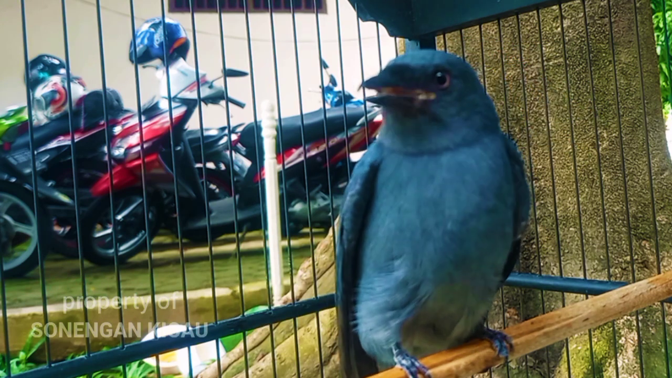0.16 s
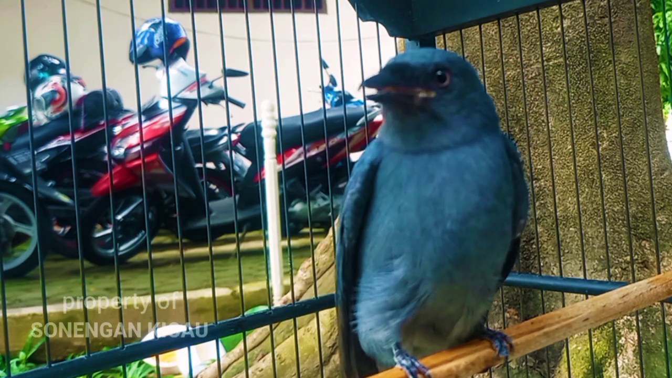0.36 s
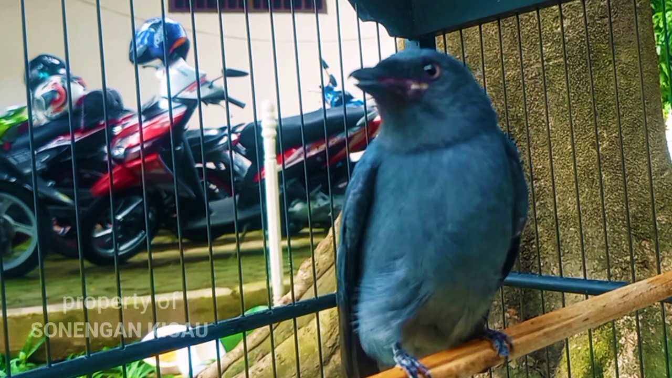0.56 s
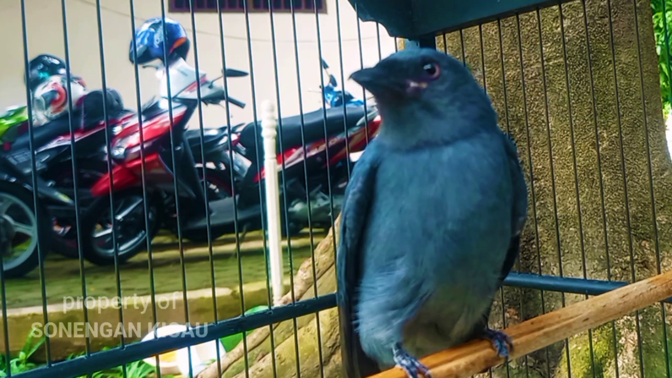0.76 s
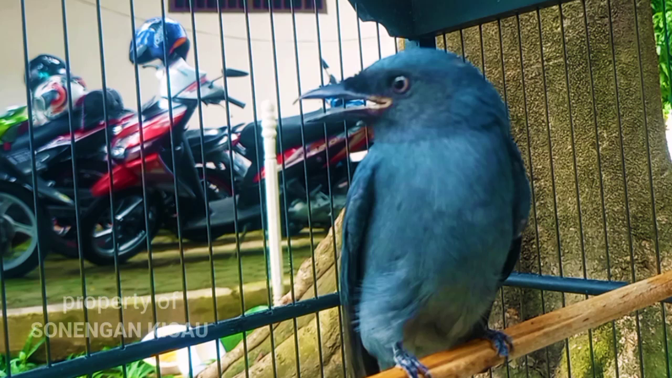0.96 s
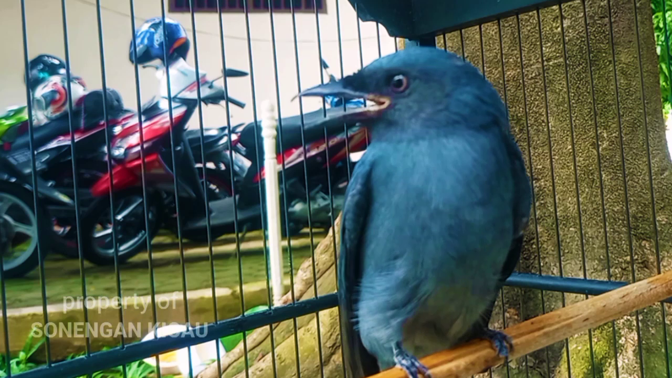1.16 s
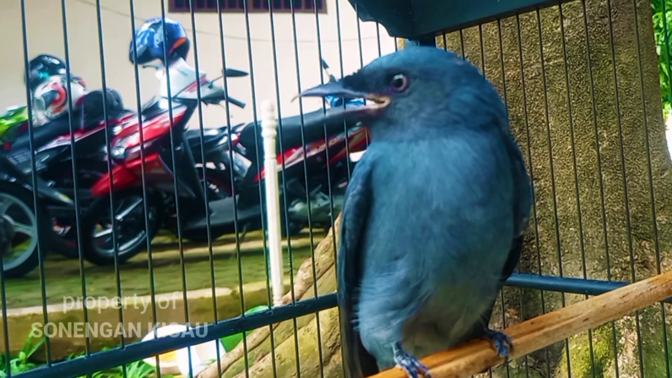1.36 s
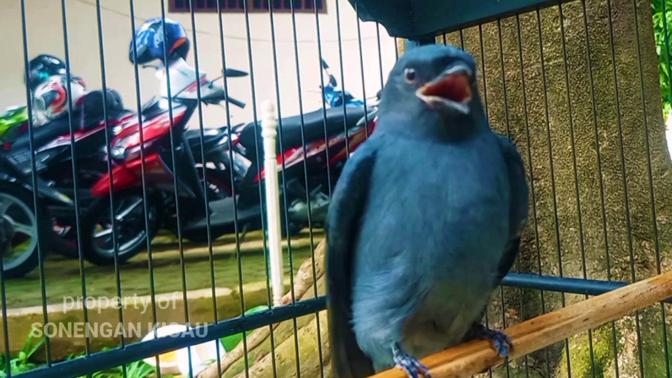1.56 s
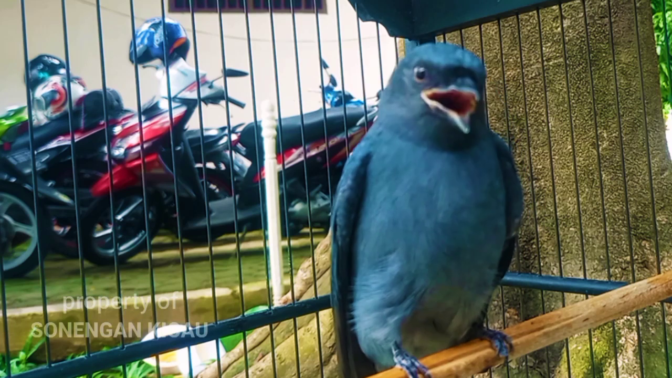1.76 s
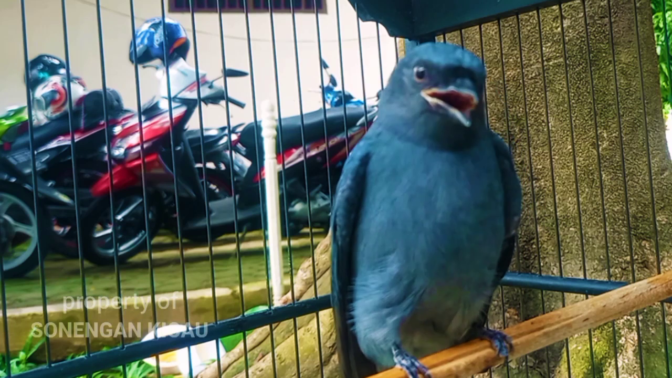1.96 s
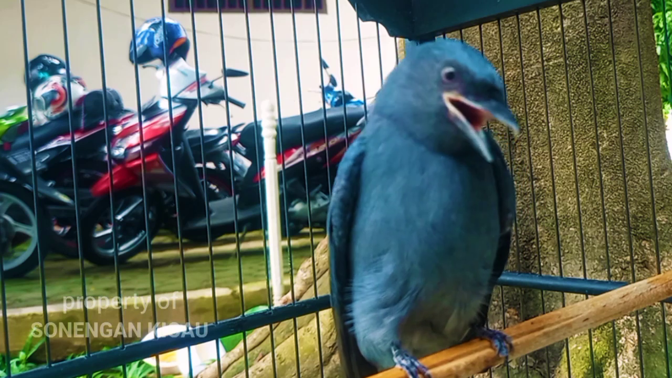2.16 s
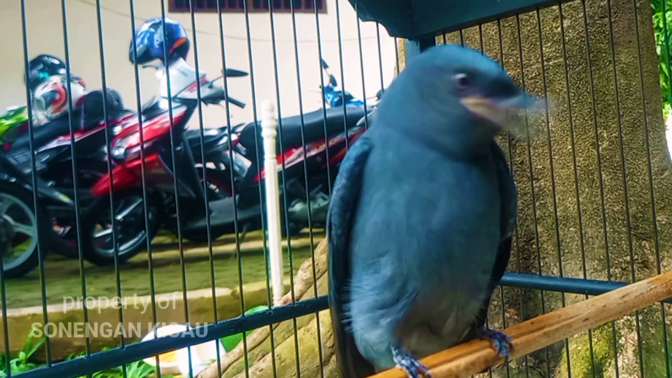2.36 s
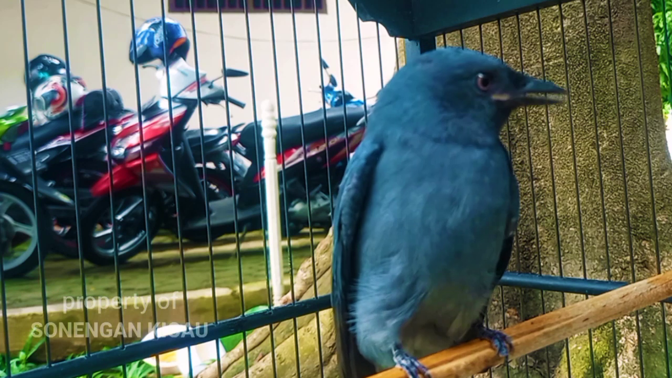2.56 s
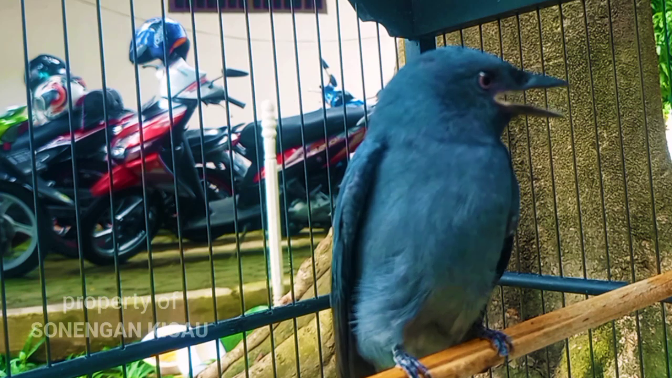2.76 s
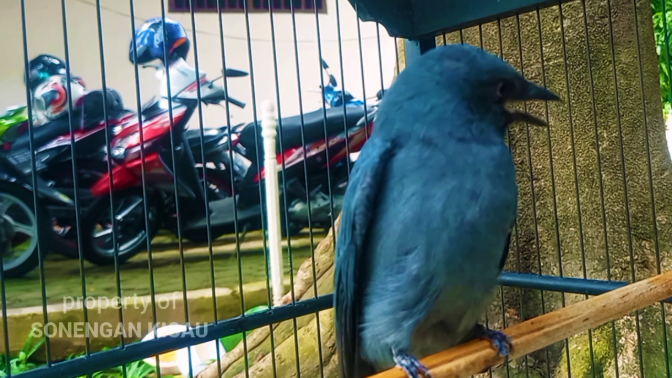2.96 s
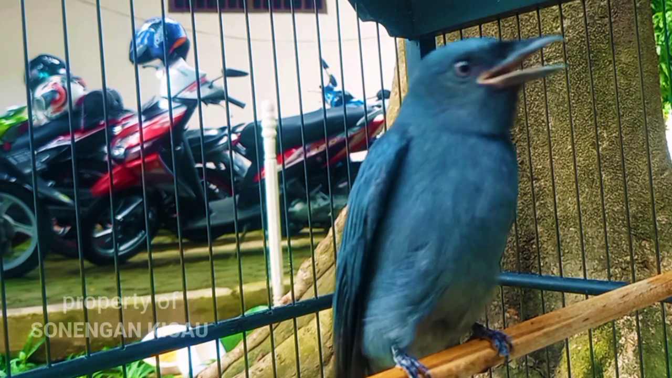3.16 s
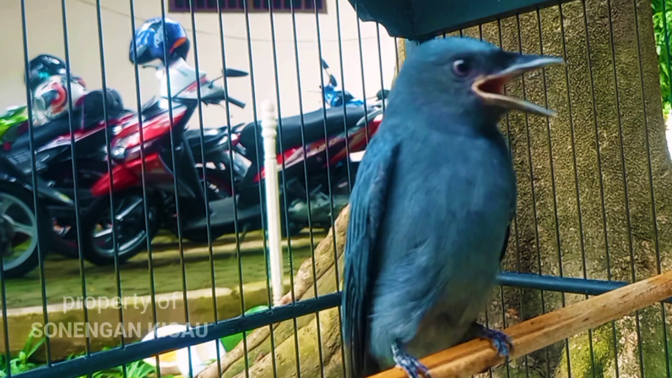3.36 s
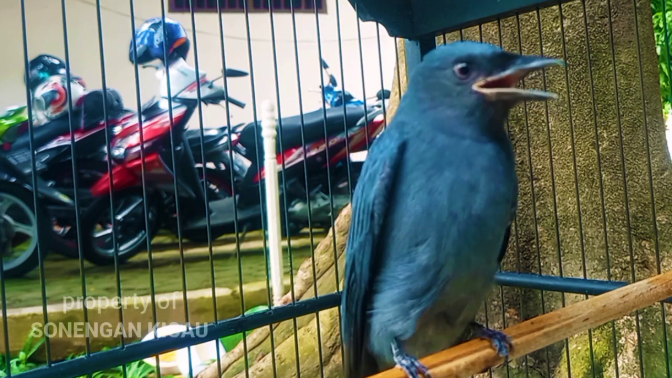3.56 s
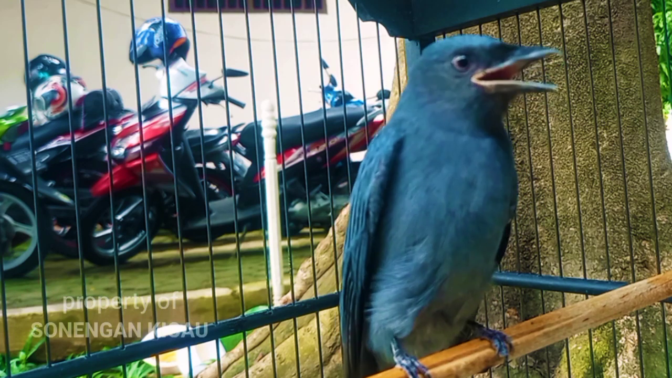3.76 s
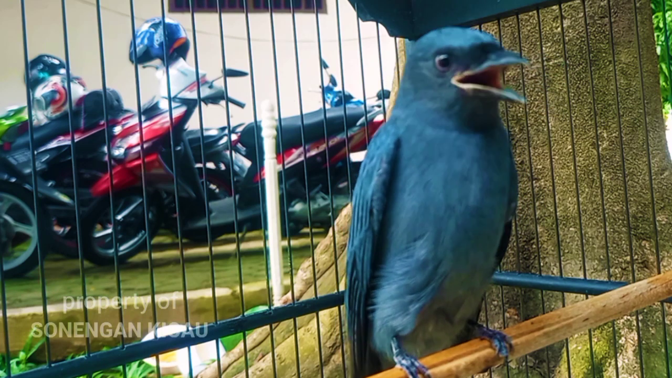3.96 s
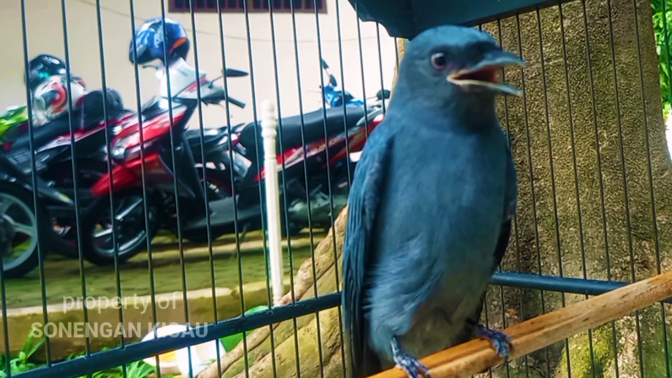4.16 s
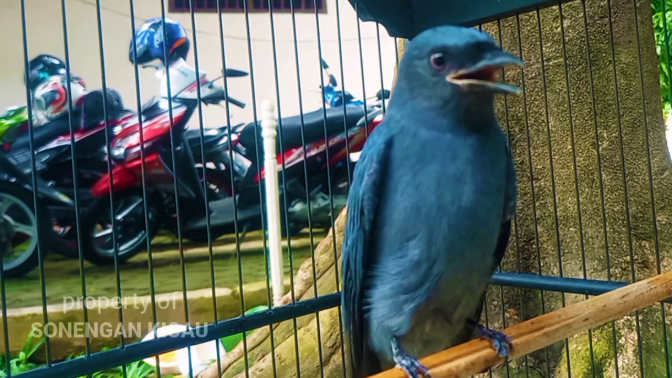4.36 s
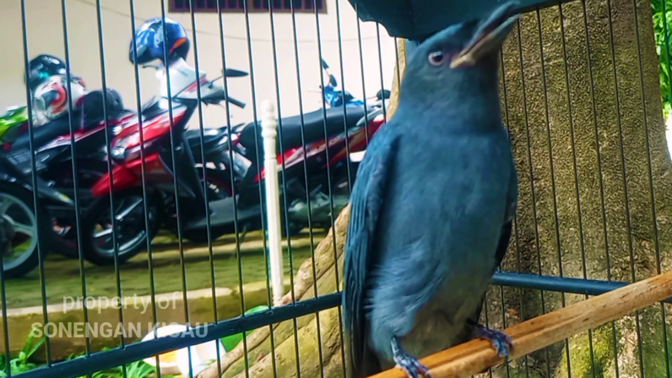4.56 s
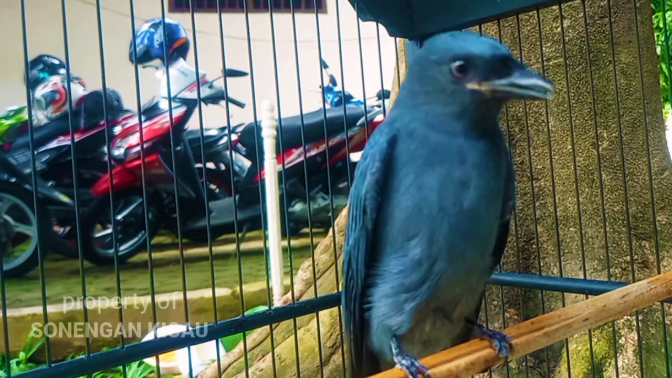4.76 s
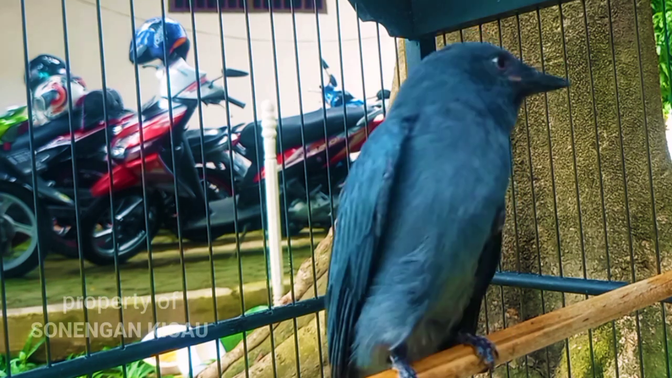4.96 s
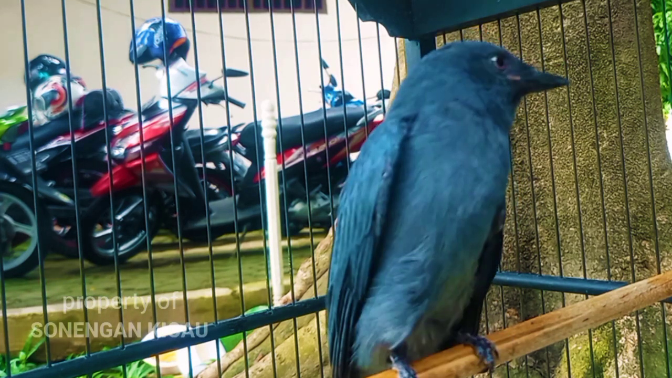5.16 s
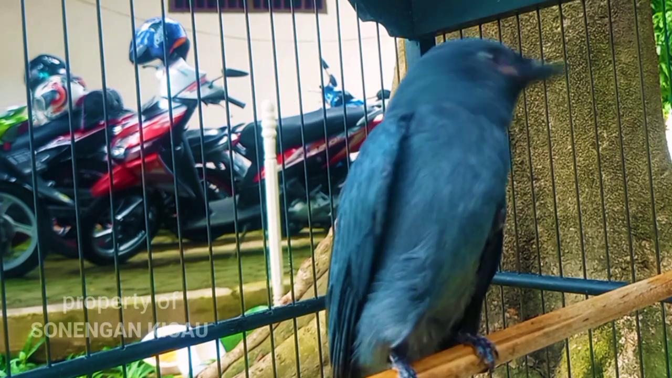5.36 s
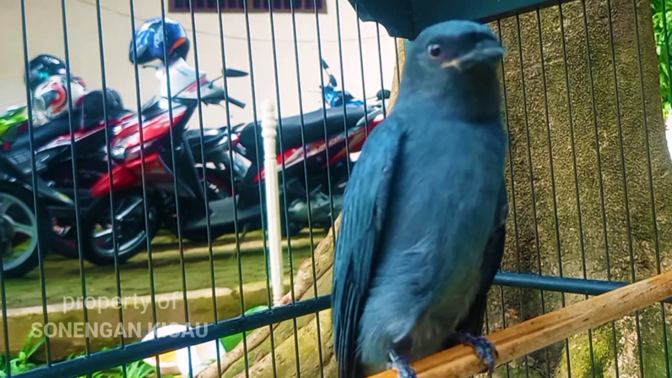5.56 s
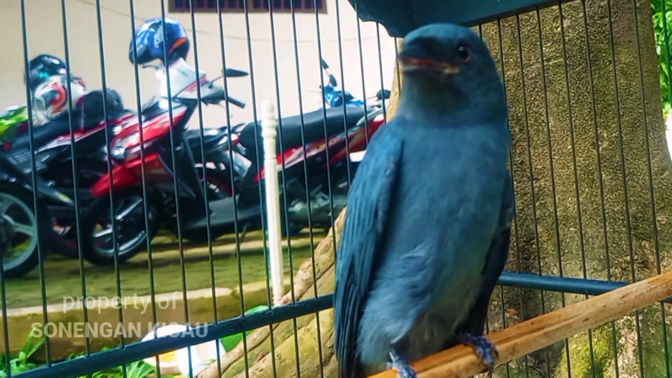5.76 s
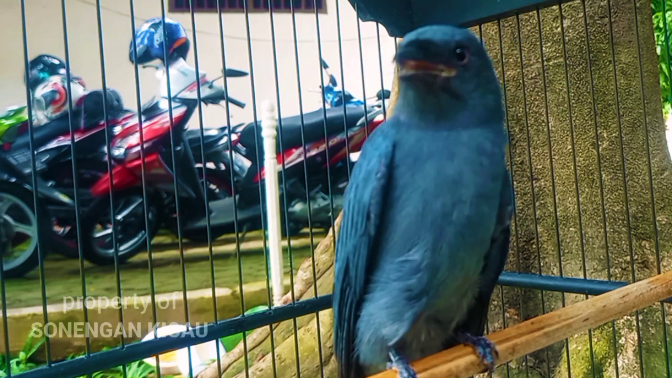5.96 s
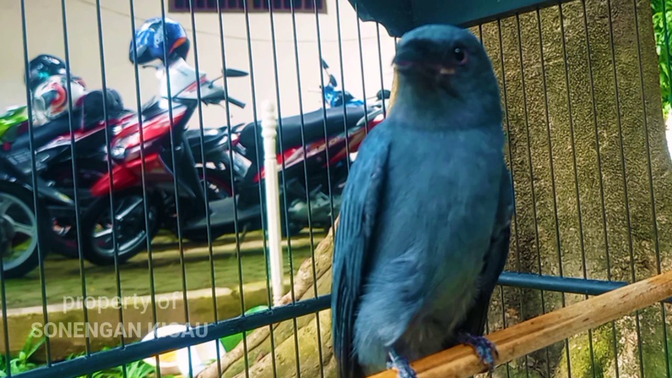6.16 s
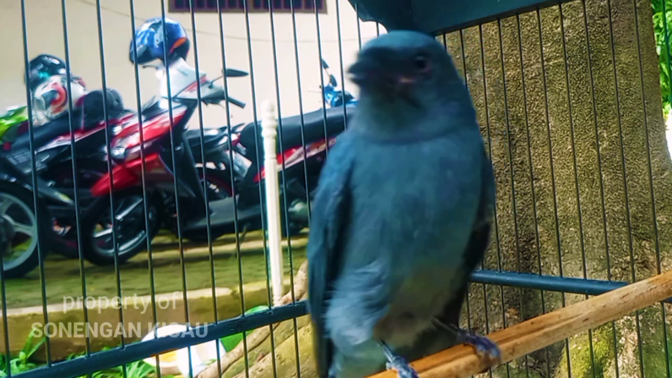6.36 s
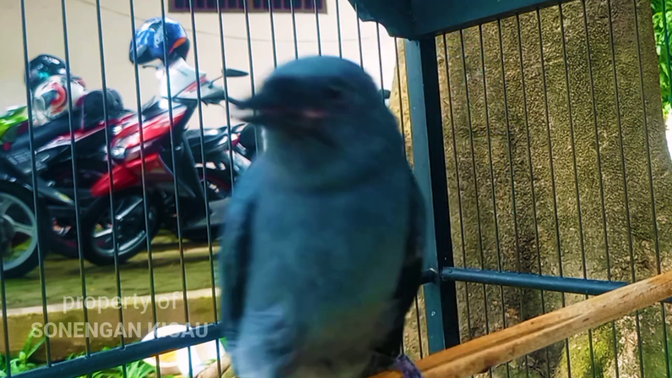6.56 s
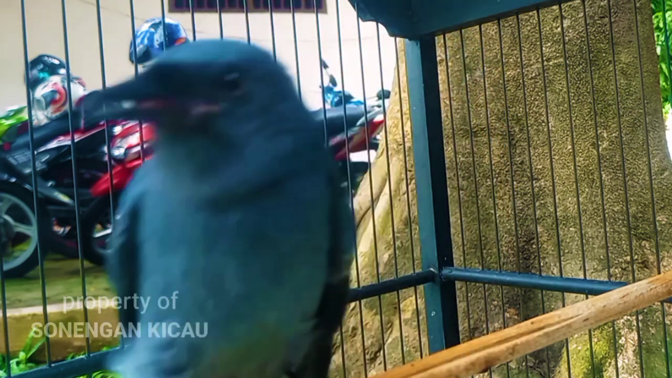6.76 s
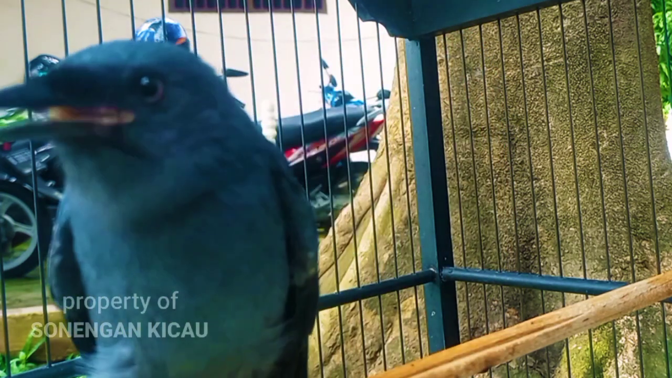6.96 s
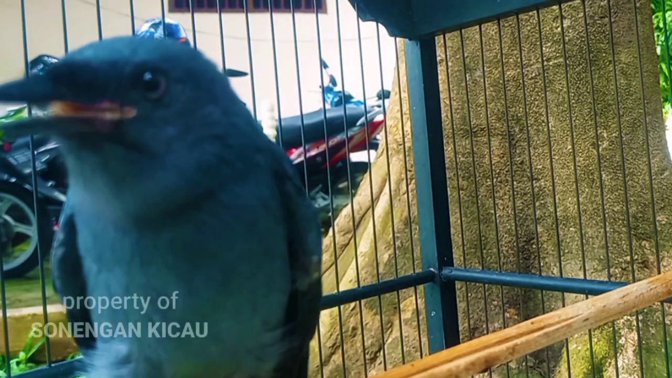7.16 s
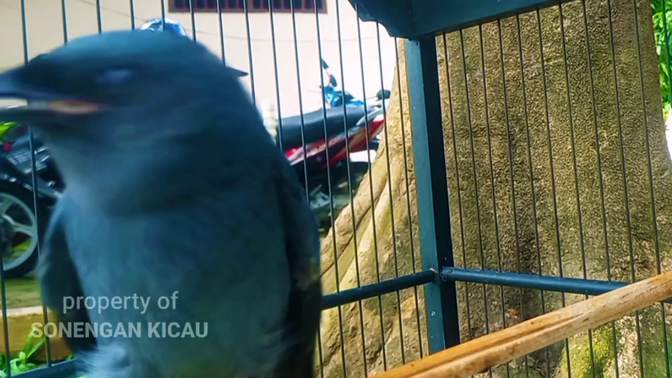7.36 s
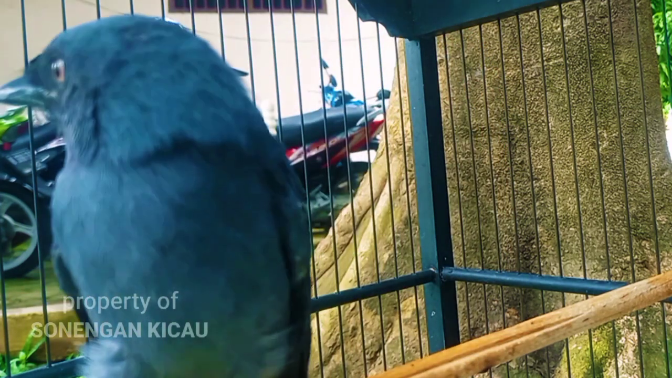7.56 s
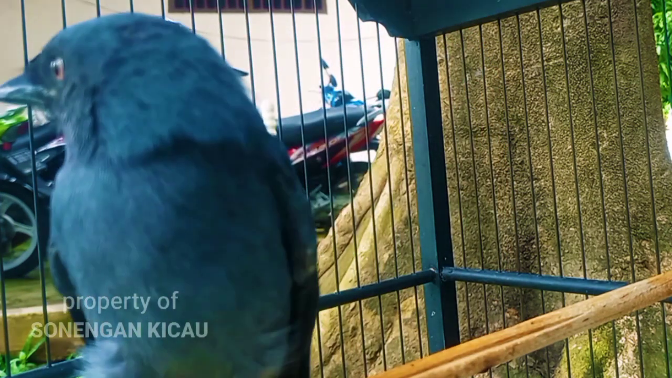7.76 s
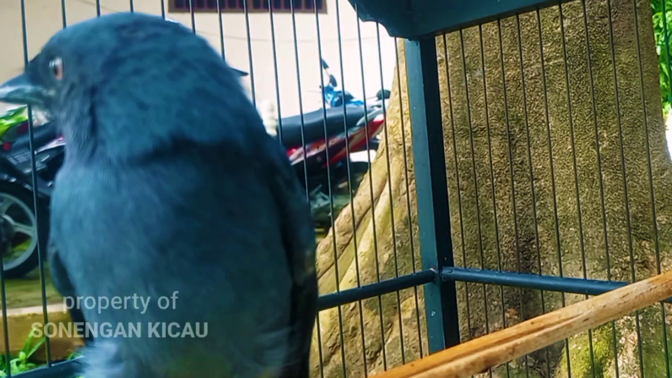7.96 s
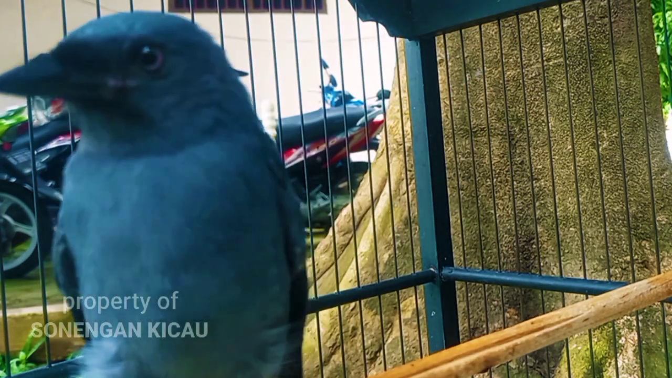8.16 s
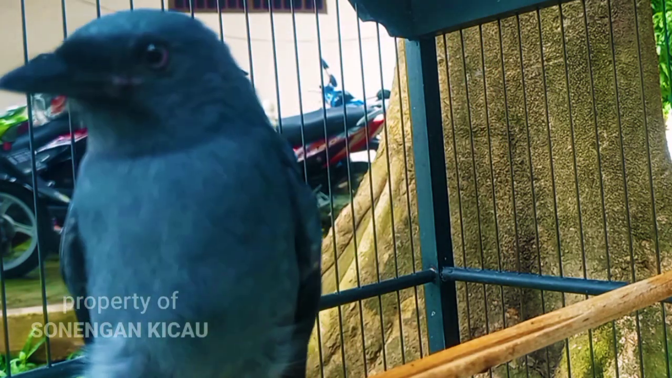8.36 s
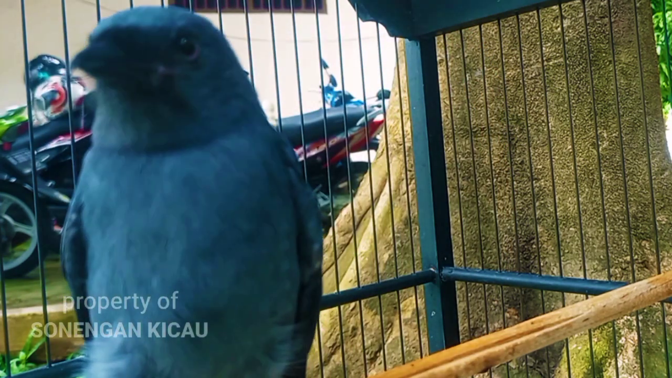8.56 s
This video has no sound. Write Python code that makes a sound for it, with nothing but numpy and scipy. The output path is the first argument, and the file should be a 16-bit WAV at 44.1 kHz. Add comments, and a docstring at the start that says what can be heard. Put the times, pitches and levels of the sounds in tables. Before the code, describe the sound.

A caged drongo sings very close to stereo microphones in a walled yard. Four short whistles open, the first rough-edged, then a long string of harsh, creaky chirps follows. After a pause come one chirp, a quick upward slur and evenly spaced clear whistles as the bird moves nearer and further left. Small beak and claw ticks, soft echoes, and low distant traffic lie around it.

```python
"""A walled yard, with distant traffic rumbling underneath as filtered noise and faint engine tones, and far-off birds.
Close to the stereo microphones a caged drongo sings: arched whistles built from harmonics, a long run of
harsh chirps that mix a mostly rising tone with chopped air noise, one clear upward slur, then whistles again
as it hops nearer. Its beak and claws tick and its feathers rustle, as short noises.
The cage colours each note with very short echoes; the walls answer softly through a decaying noise tail."""
import sys
import numpy as np
from scipy import signal
from scipy.fft import rfft, irfft, next_fast_len
from scipy.io import wavfile
from scipy.ndimage import map_coordinates

SR = 44100
rng = np.random.default_rng(int(sys.argv[2]) if len(sys.argv) > 2 else 0)


def to_wav(s):
    """Save 16-bit WAV."""
    ch = np.atleast_2d(s).T  # columns
    pcm = np.round(np.clip(ch, -1, 1) * 32767)  # PCM
    wavfile.write(sys.argv[1], SR, pcm.astype(np.int16))


N = 383669


def amp(db):
    """Decibels to gain."""
    return 10 ** (np.asarray(db) / 20)


def unit(x):
    """Scaled to rms 1."""
    return x / np.sqrt(np.mean(x ** 2) + 1e-20)


def along(points, hz):
    """(Hz, value) points read on a log frequency axis."""
    f, v = np.transpose(points)
    return np.interp(np.log(hz + 1), np.log(f + 1), v)


def path(rows, t):
    """(position, value) points joined by straight lines."""
    s, v = np.transpose(rows)
    return np.interp(t, np.maximum.accumulate(s), v)


def wobble(rate, size):
    """A smooth random curve, rate knots a second."""
    knots = rng.standard_normal(int(size * rate / SR) + 4)
    return map_coordinates(knots, [np.arange(size) * rate / SR])


def filtered(x, response):
    """x times a response of frequency."""
    size = x.shape[-1]
    m = next_fast_len(size + 2048)
    return irfft(rfft(x, m) * response(np.fft.rfftfreq(m, 1 / SR)), m)[..., :size]


def noise(spectrum, size):
    """Coloured noise of rms 1."""
    return unit(filtered(rng.standard_normal(size), lambda hz: amp(along(spectrum, hz))))


# how alike the two microphones hear a wide source: f/Hz, likeness (0 to 1)
LIKENESS = [(60, 0.97873), (130, 0.97), (250, .8), (500, 0.75), (1000, 0), (3000, 0)]


def surround(spectrum):
    """Stereo noise of rms 1: long bass waves reach both microphones alike, the treble is unrelated."""
    def mid_side(hz):
        turn = np.arccos(np.clip(along(LIKENESS, hz), -1, 1)) / 2
        return amp(along(spectrum, hz)) * [np.cos(turn), np.sin(turn)]

    mid, side = filtered(rng.standard_normal((2, N)), mid_side)
    return unit(np.array([mid + side, mid - side]))


# distant traffic before trims and surges: t/s, engines level/dB, tyres level/dB, road hiss level/dB
TRAFFIC_LEVELS = [(0.0, -37.5, -35, -55.5), (0.6, -38.5, -39, -60.5), (0.74, -39.5, -37, -57.5),
                  (1.59, -39, -37.5, -57.5), (1.86, -35, -31, -54.5), (2.76, -38.5, -39.5, -59),
                  (2.9, -34, -34, -55), (3.38, -29, -33, -55.5), (3.86, -34.5, -38.5, -57),
                  (5.14, -33.5, -37.5, -68.5), (5.31, -40.5, -43, -72), (5.83, -36, -39, -59.5),
                  (8.33, -42.5, -47, -70), (8.55, -38, -48, -69.5)]
# relative colours of engines, tyres, road and steady hiss: f/Hz, density level/dB per Hz
ENGINE_COLOUR = [(20, -33.5), (35, -26), (48, -9), (62, -7.5), (74, 2.5), (83, -1.5), (95, -1.5), (112, -6),
                 (135, -25.5), (250, -66.5)]
TYRE_COLOUR = [(70, -35), (100, -8), (120, 2.5), (145, -2.5), (175, -9.5), (220, -9), (280, -19.5),
               (350, -21.5), (480, -30.5), (800, -55)]
ROAD_COLOUR = [(250, -29), (450, -13.5), (700, -10.5), (1100, -16.5), (1600, -10), (2500, -18.5),
               (4000, -26), (9000, -57)]
HISS_COLOUR = [(500, -4.5), (2000, 0.5), (4000, -5.5), (6000, -13.5), (8000, 2.5), (10000, -6.5),
               (12000, -15), (15500, -19)]


def traffic(engines_db=-2, tyres_db=-0.5, road_db=0, hiss_db=-73, surge_db=1.36):
    """Distant engines and tyres surge as low noise, under road noise and a faint even hiss."""
    s, *levels = np.transpose(TRAFFIC_LEVELS)
    t = np.arange(N) / SR
    engine_db, tyre_db, road_level_db = [np.interp(t, s, level) + surge_db * wobble(4.6, N) for level in levels]
    rumble = amp(engine_db + engines_db) * surround(ENGINE_COLOUR)
    rumble += amp(tyre_db + tyres_db) * surround(TYRE_COLOUR)
    rumble *= amp([[.45], [-.45]])  # slightly louder on the left
    road = amp(road_level_db + road_db) * surround(ROAD_COLOUR)
    return rumble + road + amp(hiss_db) * surround(HISS_COLOUR)


# single far engines: start t/s, end t/s, first firing f/Hz, last firing f/Hz,
# 1st order level/dB before waver and pan, 2nd order level/dB over the 1st
PASSES = [(0.199, 1.6, 152, 138.7, -36, -22.5), (0.598, 1.9, 121, 110.6, -36.5, -20.5),
          (1.701, 2.792, 56, 78.96, -37.5, -5), (2.7, 5.302, 83.5, 83.02, -35, -15.5),
          (2.754, 5.3, 92, 102.4, -40, -5.5), (5.5, 6.19, 93, 93.1, -37.5, -11),
          (6.299, 9, 73, 72.98, -40.5, -16.5)]
ENGINE_FADE_S = 0.15
ENGINE_SETTLE = 1.6  # above 1, the speed changes fastest at first


def engines(waver_db=2.0):
    """Far engines fade in, settle to a new speed and fade out: two firing orders wavering under the rumble."""
    out, t = np.zeros(N), np.arange(N) / SR
    for start, end, first_hz, last_hz, db, second_db in PASSES:
        left = np.clip((end - t) / (end - start), 0, 1)
        firing_hz = last_hz + (first_hz - last_hz) * left ** ENGINE_SETTLE
        phase = cycle(firing_hz, jitter=.012, jitter_hz=9)
        fade = np.clip(np.minimum(t - start, end - t) / ENGINE_FADE_S, 0, 1)
        for order, order_db in [(1, 0), (2, second_db)]:
            out += fade * amp(db + order_db + waver_db * wobble(6, N)) * np.sin(order * phase)
    return out * amp([[.5], [-.5]])


# birds in other yards: middle t/s, half length to 1/e t/s, pitch f/Hz, spread f/Hz, peak level/dB
FAR_CALLS = [(.88, 0.091, 800, 35, -53), (.919, .17, 1560, 130, -59.5), (5.25, .08, 2980, 218, -69),
             (5.349, 0.22, 1920, 149, -70), (5.749, .2, 2040, 150.5, -68), (5.72, 0.42, 2970, 152.5, -68),
             (5.721, 0.17, 1600, 50, -76), (8.0, 0.074, 1544, 25, -67), (8.265, .07, 1560, 25.04, -71)]


def far_birds():
    """Calls from other yards, blurred by echoes, arrive as soft, narrow washes of noise."""
    out, t = np.zeros((2, N)), np.arange(-SR // 2, SR // 2) / SR
    for middle, half_length, pitch_hz, spread_hz, db in FAR_CALLS:
        band = lambda hz: np.exp(-((hz - pitch_hz) / spread_hz) ** 2)
        wash = unit(filtered(rng.standard_normal((2, len(t))), band))
        call = amp(db) * wash * np.exp(-(t / half_length) ** 2)
        room_left = out[:, round((middle - .5) * SR):][:, :len(t)]
        room_left += call[:, :room_left.shape[1]]
    return out


# decay of the far walls: f/Hz, t60/s
WALL_DECAY = [(500, 0.36), (3000, 0.46), (6000, .47), (10000, 0.43), (15000, 0.09)]
# colour of the yard's answer: f/Hz, level/dB
WALL_COLOUR = [(1000, -1), (2300, 1.5), (3200, 0.5), (5000, 1.5), (7000, 1), (10000, 3), (14000, 7)]
# the yard is heard less as the bird comes nearer: t/s, send level/dB
ECHO_SEND = [(0, 0.5), (1.2, -0.5), (6.7, -0.5), (6.9, -1)]


def yard(x, near_db=-8.5, far_db=-24, near_t60=0.059):
    """Cage and tree trunk scatter the song at once; the walls give a longer, faint tail."""
    hz, t, z = signal.stft(rng.standard_normal((2, SR)), SR, nperseg=256)
    decay = amp(-60 * t / along(WALL_DECAY, hz)[:, None])
    far = signal.istft(z * decay, SR, nperseg=256)[1][:, :SR]
    t = np.arange(SR) / SR
    far = far * (1 - np.exp(-t / 0.013))
    scatter = rng.standard_normal((2, SR)) ** 3  # a few strong reflections among weak ones
    near = scatter * amp(-60 * t / near_t60) * (t > .0006)
    answer = amp(near_db) * near / np.linalg.norm(near, axis=1)[:, None]
    answer += amp(far_db) * far / np.linalg.norm(far[0])
    answer = filtered(answer, lambda hz: amp(along(WALL_COLOUR, hz)))
    sent = x * amp(path(ECHO_SEND, np.arange(N) / SR))
    return signal.fftconvolve(sent, answer, axes=1)[:, :N]


# very short echoes off the cage: f/Hz, level/dB each
CAGE_ECHO = [(2500, -26), (5000, -18), (9000, -13)]


def cage(hz, count=3):
    """Short, mostly treble echoes off the cage, drawn anew for each note and microphone."""
    delay = rng.uniform(.0002, .0014, (count, 2, 1))
    gain = amp(along(CAGE_ECHO, hz))
    echoes = gain * np.exp(-2j * np.pi * hz * delay).sum(0)
    return (1 + echoes) / np.sqrt(1 + count * gain ** 2)


# the bird's direction: t/s, lead of the left microphone/ms
DIRECTION = [(0, .18), (1.5, 0.18), (1.75, 0.14349), (2.8, 0.1), (3.5, 0.11), (4.4, 0.12), (6.45, .17),
             (7.1, .32)]
PAN_DB_PER_MS = 27.5  # the farther left, the louder on the left


def add(out, start, note):
    """Place a note: the small beak radiates no bass; the left microphone hears it first and louder."""
    lead_ms = path(DIRECTION, start)
    side = np.array([[.5], [-.5]])

    def to_microphones(hz):
        beak = hz ** 6 / (hz ** 6 + 1030.0 ** 6)
        shift = np.exp(2j * np.pi * hz * lead_ms / 1000 * side)
        return beak * cage(hz) * amp(side * PAN_DB_PER_MS * lead_ms) * shift

    out[:, round(start * SR):][:, :len(note)] += filtered(note, to_microphones)


def cycle(pitch, jitter, jitter_hz):
    """Phase of a vibration, such as a membrane's, whose pitch trembles."""
    trembling = pitch * (1 + jitter * wobble(jitter_hz, len(pitch)))
    return 2 * np.pi * np.cumsum(trembling) / SR


# relative colour of turbulence in the syrinx, also lent to ticks and feathers: f/Hz, density level/dB per Hz
TURBULENCE = [(600, -56), (950, -27), (1300, -9.5), (2500, 7), (3600, -7), (4900, 5), (5700, 0.5),
              (6800, -2.5), (8500, -5), (10000, -2.5), (11200, -11), (12500, -1), (15500, -11.5)]


def rasp(phase, depth):
    """Air noise, chopped once a cycle by the membrane."""
    return unit(noise(TURBULENCE, len(phase)) * (1 + depth * np.cos(phase)))


# beak and claws: t/s, onset level/dB
TICK_TIMES = [(0.464, -37), (4.685, -48.5), (4.738, -44), (4.746, -46.5), (4.753, -46), (6.884, -41.5),
              (8.32, -59.5)]
# feathers: middle t/s, half length to 1/e t/s, peak level/dB before flutter
FEATHERS = [(.76, 0.087, -59.5), (4.73, 0.1044, -59.5), (8.385, 0.083, -79.5)]


def fidgets(t60=0.013):
    """Dry decaying ticks of beak and claws, and soft noisy rustles of feathers that swell and fade."""
    out, t = np.zeros((2, N)), np.arange(SR // 20) / SR
    for s, db in TICK_TIMES:
        add(out, s, amp(db - 60 * t / t60) * noise(TURBULENCE, len(t)))
    t = np.arange(N) / SR
    swells = sum(amp(db) * np.exp(-((t - middle) / half_length) ** 2) for middle, half_length, db in FEATHERS)
    return out + swells * amp(4.3 * wobble(100, N)) * surround(TURBULENCE)


# resonances of throat and open beak, for creak and chirp: f/Hz, level/dB
THROAT_GAIN = [(1200, -9), (1900, -9), (2500, -1), (3300, 3.5), (3800, -3.5), (4900, -6), (5700, -4.5),
               (6900, -1.5), (8400, -13.5), (9600, -8.5), (11000, -19), (12500, -10.5), (15500, -24.5)]
CREAK_HZ = 1276  # reference pitch, before the slide and random detune


def creak(t, jump):
    """The low, rough voice that opens a harsh note, slides into its pitch jump and grates on beneath it."""
    pitch = CREAK_HZ * path([(jump - .035, .97), (jump - .014, 1.0), (jump - .004, 1.13),
                             (jump + 0.0013, 1.3), (jump + .007, 1.05)], t)
    pitch = pitch * amp(.2 * rng.standard_normal() + .3 * wobble(160, len(t)))
    phase = cycle(pitch, jitter=.024, jitter_hz=1300)
    voice = np.zeros(len(t))
    for k in range(1, 12):
        boost_db = 3.4 * (k == 1) + 3 * (k == 2)
        flutter_db = 3.5 * wobble(300, len(t))
        voice += amp(along(THROAT_GAIN, k * pitch) + boost_db + flutter_db) * np.sin(k * phase)
    return unit(voice)


def first_creak(start=0.016, jump=.031, end=0.098, db=-24):
    """The very first whistle opens harshly, like a chirp: creak and air noise."""
    out, t = np.zeros((2, N)), np.arange(start, end, 1 / SR)
    air = amp(db + path([(start, -20), (jump - .008, -4), (jump, 0), (end, -26)], t))
    add(out, start, air * unit(creak(t, jump) + noise(TURBULENCE, len(t))))
    return out


# one long upward slur: t/s, pitch f/Hz, level/dB before a common trim
SLUR_PATH = [(6.054, 2031, -49), (6.064, 2248, -25.5), (6.085, 2352, -18.5), (6.097, 2550, -18),
             (6.107, 2857, -20), (6.118, 3420, -15), (6.13, 3540, -17.5), (6.139, 3934, -13),
             (6.157, 3832, -44.5)]
# its air noise is strongest against the tone while the pitch is low: pitch f/Hz, level/dB re the tone
SLUR_AIR = [(2200, -15), (2900, -20), (3400, -24.5), (3900, -29.5)]
FLARE_HZ, FLARE_WIDTH_HZ, FLARE_DB = 5100, 340, 8  # the throat's resonance


def slur(high_db=-21):
    """A clear rising whistle whose overtones flare as the second harmonic passes a throat resonance."""
    s, *columns = np.transpose(SLUR_PATH)
    out, t = np.zeros((2, N)), np.arange(s[0], s[-1], 1 / SR)
    pitch, level_db = [np.interp(t, s, column) for column in columns]
    phase = cycle(pitch, jitter=0.0025, jitter_hz=900)
    flare = amp(FLARE_DB) / (1 + ((2 * pitch - FLARE_HZ) / FLARE_WIDTH_HZ) ** 2) ** .76
    overtones = np.sin(2 * phase) + amp(high_db) * (np.sin(3 * phase) + np.sin(4 * phase))
    tone = np.sin(phase) + flare * overtones
    air = amp(along(SLUR_AIR, pitch)) * rasp(phase, depth=0.8283)
    add(out, s[0], amp(level_db + 2.0) * (tone + air))
    return out


# whistles, levels before common trims: start t/s, top of the rise t/s, end t/s, top f/Hz,
# sag and final drop (shares of the top pitch), level/dB, 2nd harmonic level/dB,
# high overtones level/dB, 2nd harmonic in the rise level/dB
WHISTLE_NOTES = [(.025, .057, .106, 3040, .96, .62, -22, -16, -34, -48),
                 (.19, .219, .275, 3240, .93, .62, -17, -33, -43, -28.5),
                 (.379, .405, .466, 3250, .9, .66, -16.5, -37, -46, -32),
                 (.55, .578, .637, 3220, .92, .72, -19.5, -35, -46, -34),
                 (6.276, 6.291, 6.354, 3280, .89, .9, -19.5, -51, -56, -29.5),
                 (6.438, 6.456, 6.521, 3280, .95, .88, -19.5, -55, -57, -38),
                 (6.603, 6.624, 6.685, 3355, .93, .8, -18, -46.5, -54, -39),
                 (6.772, 6.794, 6.86, 3260, .95, .9, -15.5, -50, -42.5, -39),
                 (6.942, 6.965, 7.032, 3270, .93, .85, -15.5, -51, -40, -44),
                 (7.116, 7.133, 7.198, 3313, .92, .9, -16, -50, -37.5, -40.5),
                 (7.295, 7.308, 7.374, 3360, .9, .92, -16.5, -50, -36.5, -43),
                 (7.502, 7.518, 7.587, 3260, .935, .94, -16.5, -54, -37, -49)]
SAG_S, WHISTLE_START_HZ = .017, 1927  # the sag comes this long before the end; pitch at the start
WHISTLE_RASP_DB = -47.5  # air noise, before strain and push
STRAIN_PER_DB = 0.68  # whistles with stronger high overtones also rasp more


def whistles():
    """A clean tone sweeps up, arches and sags; around the sag it briefly turns rough and bright."""
    out = np.zeros((2, N))
    for start, top, end, top_hz, sag, drop, level_db, second_db, high_db, rise_db in WHISTLE_NOTES:
        t = np.arange(start - .003, end + .006, 1 / SR)
        sag_hz = sag * top_hz
        pitch = path([(start, WHISTLE_START_HZ), (top, .94 * top_hz), (top + .011, top_hz),
                      ((top + end) / 2 - .004, top_hz), (end - SAG_S, sag_hz), (end - .008, sag_hz),
                      (end + .006, drop * top_hz)], t)
        push = amp(path([(start - .003, -45), (start + .004, -14), (top, -4.5), (top + .015, -1),
                         (end - .024, 2), (end - .01, -1.5), (end - .003, -10), (end + .002, -22),
                         (end + .006, -45)], t))
        rise = amp(path([(start - .003, -35), (start + 0.0028, -2), (top - .008, 3), (top, -14),
                         (top + .036, -50)], t))
        strain = np.exp(-((t - end + .014) / .009) ** 2)
        pitch = pitch * (1 + (.004 + .014 * strain) * wobble(220, len(t)))
        phase = cycle(pitch, jitter=.0018 + .012 * strain, jitter_hz=944)
        note = amp(level_db + 5.5) * push * np.sin(phase)
        note += (amp(second_db + 1.5) * push + amp(rise_db + 3) * rise) * np.sin(2 * phase)
        for k, db in [(3, -4), (4, 1.0), (5, 0)]:
            gain = amp(high_db + db + 3 * (strain - .5)) * push ** 2 + amp(rise_db - 24.5) * rise
            flutter = amp(3.9 * wobble(170, len(t)))
            note += gain * flutter * np.sin(k * phase) * (k * pitch < SR / 2)
        air = push * (0.1 + 1.9 * strain) + 0.27 * rise
        air_db = WHISTLE_RASP_DB + STRAIN_PER_DB * (high_db + 43)
        note += amp(air_db) * air * rasp(phase, depth=1.0)
        add(out, start - .003, note)
    return out


# wide rises start slowly: size of the rise f/Hz, share of it done halfway
RISE_BEND = [(250, 0.66), (600, .37)]
# low chirps lose their overtones as they go, high ones gain: crest f/Hz, 2nd harmonic swell level/dB
OVERTONE_SWELL = [(2100, -9.5), (2600, 1)]
FADE_DB = -3  # the fundamental fades along the rise
FALL_S = .022  # a chirp drops away for this long after its crest
SECOND_DB, SECOND_PER_HARSH = 4.5, .5  # the harsher a chirp, the stronger its 2nd harmonic


def chirp_tone(t, jump, crest, low_hz, crest_hz, harsh_db, bright_db):
    """The rising tone and its phase; each harmonic swells as it crosses a resonance of the throat."""
    grate, flutter_db, end = .17, 2.6, crest + FALL_S
    half, rise_hz = jump + .55 * (crest - jump), crest_hz - low_hz
    half_hz = low_hz + path(RISE_BEND, rise_hz) * rise_hz
    pitch = path([(jump - .004, .8 * low_hz), (jump + .002, low_hz), (half, half_hz),
                  (crest - .004, crest_hz), (crest + .004, crest_hz), (crest + .012, .91 * crest_hz),
                  (end + .006, .62 * crest_hz)], t)
    pitch = pitch * (1 + .009 * wobble(170, len(t)))
    push_db = path([(jump - .008, -35), (jump + .002, -7), (half, 0), (crest - .008, 2),
                    (crest + .007, -4), (end, -19), (end + .01, -50)], t)
    # the overtones need full pressure: they come late and leave early
    pressure_db = path([(jump, -3), (jump + 0.034, 0), (crest, 0), (end, -18)], t)
    progress = np.clip((t - jump) / (crest - jump), 0, 1)
    hoarse = amp(.55 * (harsh_db + 4))
    # the two sides of the syrinx beat against each other, which puts sidebands between the harmonics
    beat = grate * hoarse * np.sin(cycle(np.full(len(t), 1300), jitter=.12, jitter_hz=400))
    phase = cycle(pitch, jitter=.009 * hoarse, jitter_hz=1454) + beat / 2
    body = (t > jump) & (t < crest + .005)
    levels = [1, SECOND_DB + SECOND_PER_HARSH * harsh_db, bright_db]
    levels += [(bright_db + harsh_db) / 2 + db for db in (-3, -4.5, -7.5)]  # harmonics 4 to 6
    tone = np.zeros(len(t))
    for k, db in enumerate(levels, 1):
        if k == 1:
            shape_db = FADE_DB * progress
        else:
            shape_db = pressure_db + path(OVERTONE_SWELL, crest_hz) * progress * 2 / k
        flutter = flutter_db * np.sqrt(k / 2) * wobble(260, len(t))
        gain = amp(push_db + shape_db + along(THROAT_GAIN, k * pitch) + flutter)
        gain /= np.sqrt(np.mean(gain[body] ** 2))
        tone += amp(db) * gain * np.sin(k * phase) * (k * pitch < SR / 2)
    return tone * (1 + beat), phase


# harsh chirps, levels before common trims: start t/s, pitch jump t/s, crest t/s, after the jump f/Hz,
# crest f/Hz, level/dB, harshness (rasp over the tone) level/dB, brightness (3rd harmonic) level/dB
CHIRP_NOTES = [(1.035, 1.06, 1.079, 1470, 1798, -37, 3.5, -2.5),
               (1.17, 1.207, 1.234, 1870, 2226, -32, 1.5, 3),
               (1.32, 1.355, 1.408, 2000, 3310, -23.5, -7, 1.5),
               (1.521, 1.548, 1.605, 1980, 3462, -22.5, -9.5, -1.5),
               (1.695, 1.743, 1.786, 1969, 2480, -28, -3, 4),
               (1.849, 1.89, 1.911, 2000, 1987, -31, 4.5, -3), (1.974, 2.01, 2.05, 2050, 2355, -27, -6, 2),
               (2.141, 2.179, 2.203, 1890, 2132, -30.5, 1, -0.5),
               (2.273, 2.308, 2.343, 1820, 2137, -31.5, 1.5, 2),
               (2.467, 2.491, 2.553, 2080, 2552, -24, -13, -8),
               (2.741, 2.769, 2.826, 1860, 2594, -27.5, -12.5, 0),
               (2.894, 2.923, 2.979, 2080, 2530, -27.5, -9, 1),
               (3.034, 3.059, 3.119, 2060, 2535, -25.5, -10.5, -1.5),
               (3.203, 3.227, 3.287, 2020, 2643, -24.5, -12, 0),
               (3.344, 3.381, 3.41, 2080, 2224, -26, -1.5, 6.5),
               (3.456, 3.489, 3.523, 2020, 2271, -24.5, -2.5, 8),
               (3.573, 3.599, 3.663, 2282, 2644, -24, -6.5, 3),
               (3.738, 3.757, 3.833, 2110, 2493, -24.5, -8.5, -1),
               (3.907, 3.93, 3.988, 2080, 2355, -26, -8, 2.5),
               (4.051, 4.083, 4.126, 2100, 2324, -25.5, -6, 4),
               (4.236, 4.248, 4.313, 2080, 2537, -26, -10, -0.5),
               (4.431, 4.451, 4.514, 2070, 2499, -25.5, -11.5, -3),
               (5.879, 5.902, 5.941, 2150, 2317, -24.5, -14, -17.5)]
TONE_DB = 2.5  # trim of the voiced part


def chirps(gape_tilt=.29):
    """A creak jumps to a mostly rising tone that drops away at the end, with rasping air throughout."""
    pulsing_db = 2.0
    out = np.zeros((2, N))
    for start, jump, crest, low_hz, crest_hz, level_db, harsh_db, bright_db in CHIRP_NOTES:
        t = np.arange(start, crest + 2 * FALL_S, 1 / SR)
        tone, phase = chirp_tone(t, jump, crest, low_hz, crest_hz, harsh_db, bright_db)
        air = amp(path([(start, -30), (start + 0.0056, -21), (start + .009, -5.5), (jump, -3),
                        (crest - .015, -.5), (crest, -2), (crest + .016, -11), (t[-1], -50)], t))
        opening = amp(path([(start, -24), (start + .006, -17), (start + .012, -3), (jump - .003, 0),
                            (jump + 0.0065, -5), (crest, -7), (t[-1], -55)], t))
        scrape = air * rasp(phase, depth=.8) + opening * creak(t, jump)
        scrape = scrape * amp(pulsing_db * wobble(450, len(t)))
        note = amp(level_db) * (amp(TONE_DB) * tone + amp(harsh_db + .5) * scrape)
        # a wide gape lets the top treble out, a half-closed beak holds it back
        gape_db = gape_tilt * (bright_db + 1.5)
        add(out, start, filtered(note, lambda hz: amp(along([(7000, 0.0018), (13000, gape_db)], hz))))
    return out


def scene():
    """The bird close by, its yard answering, and the distance behind."""
    bird = fidgets() + first_creak() + slur() + whistles() + chirps()
    return traffic() + engines() + far_birds() + yard(bird) + bird


TOP_HZ = 15830  # band limit


def record(dry):
    """The recorder rounds off the highest peaks and keeps nothing above its band limit."""
    rounded = dry / (1 + (dry / .87) ** 8) ** (1 / 8)
    return filtered(rounded, lambda hz: hz < TOP_HZ)


dry = scene()
out = record(dry)
to_wav(out)
```